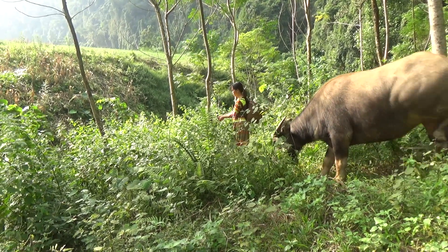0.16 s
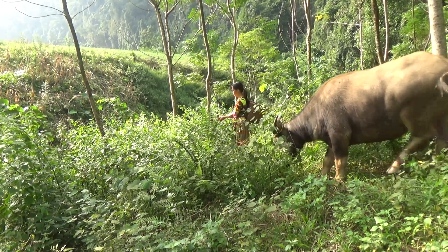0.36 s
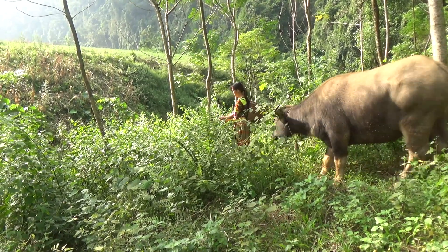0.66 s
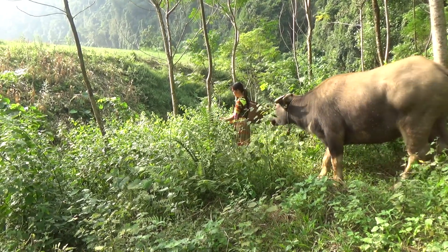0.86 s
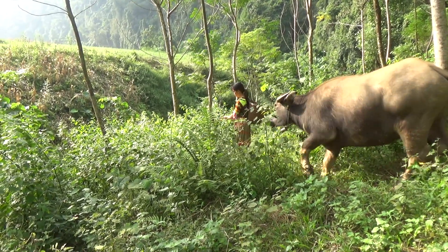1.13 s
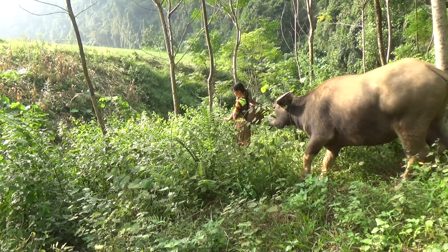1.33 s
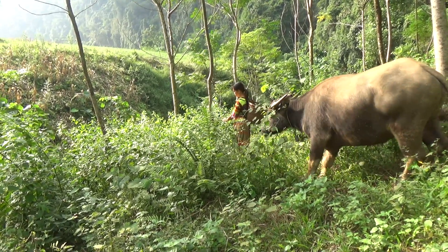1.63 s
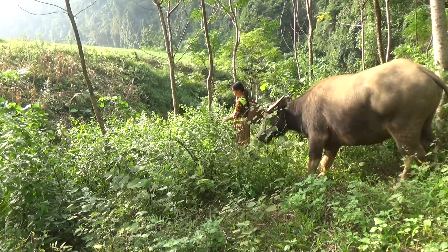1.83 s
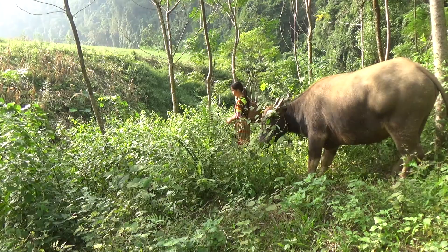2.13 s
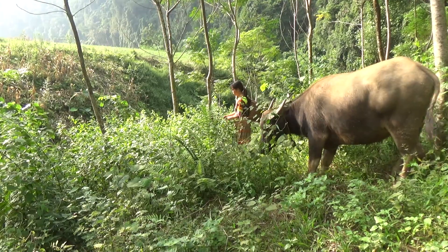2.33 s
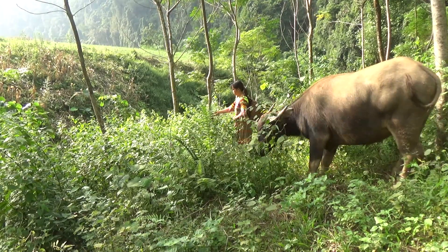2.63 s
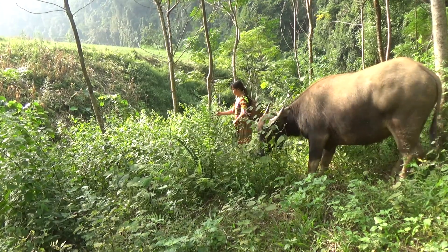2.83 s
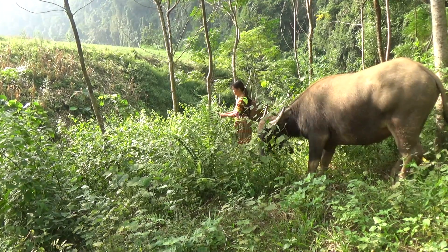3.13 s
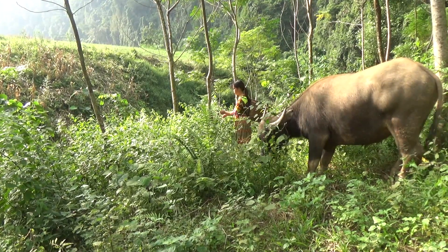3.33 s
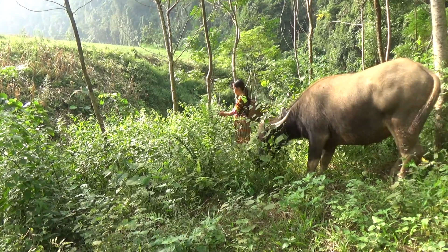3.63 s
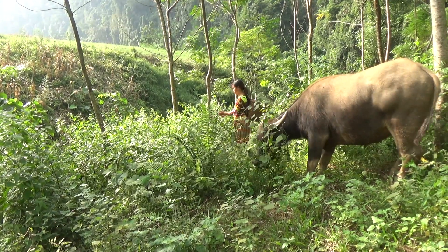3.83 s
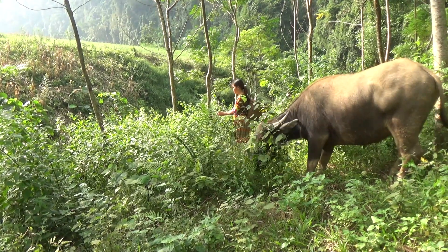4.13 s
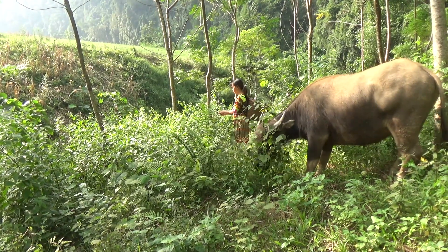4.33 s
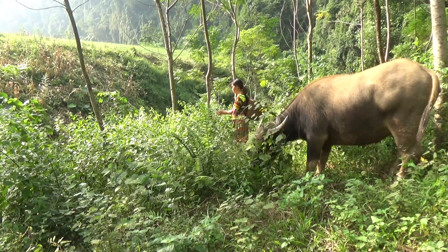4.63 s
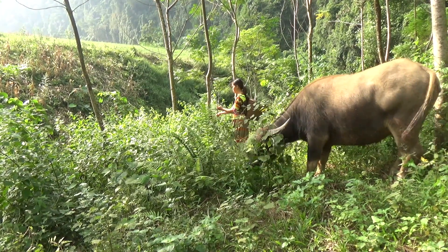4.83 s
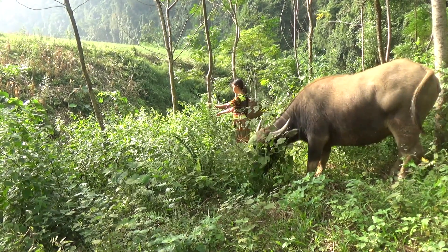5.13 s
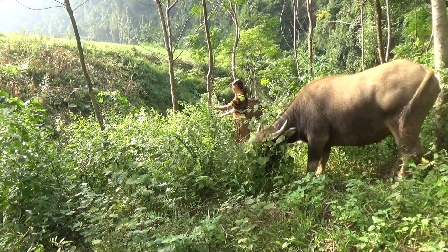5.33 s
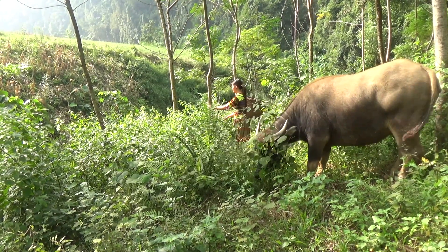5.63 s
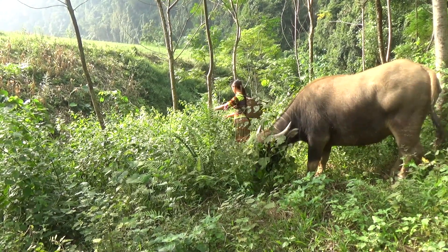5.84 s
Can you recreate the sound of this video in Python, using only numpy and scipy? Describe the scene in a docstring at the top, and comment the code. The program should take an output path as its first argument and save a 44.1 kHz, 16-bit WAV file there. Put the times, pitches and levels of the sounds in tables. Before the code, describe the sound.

A small metal bell clinks unevenly as a buffalo grazes, stems snapping and leaves swishing, over a fast cricket trill and thin insect hiss.

```python
"""A small metal bell clinks on the neck of a buffalo grazing in forest undergrowth a few metres off:
each blow sets off a set of fading sine tones. Stems snap and leaves swish (shaped noise), and hooves thud
(short low tones). A near cricket trills (a pulsed sine) until it stops at about 4 s, while a far one (throbbing
noise) swells late. Behind them lie a far insect chorus, the forest and a soft rumble, all coloured noise."""
import sys
import numpy as np
from scipy import signal
from scipy.fft import rfft, irfft, next_fast_len
from scipy.io import wavfile
from scipy.ndimage import uniform_filter1d

SR = 44100
rng = np.random.default_rng(int(sys.argv[2]) if len(sys.argv) > 2 else 0)


def waveform_to_disk(signal):
    """Save audio, clipped to [-1, 1], as 16-bit WAV at the path in sys.argv[1]."""
    frames = np.transpose(np.atleast_2d(signal))
    scaled = np.clip(frames, -1, 1) * 32767
    samples = np.round(scaled).astype(np.int16)
    wavfile.write(sys.argv[1], SR, samples)


N = 263718
T = np.arange(N) / SR  # time in s

# Colours of the noises; only the shape counts, loudness is set elsewhere: pitch_hz, relative_db
RUMBLE_COLOUR = [(20, -47), (60, -5), (128, 2), (200, 0.5), (350, -36)]
FOREST_COLOUR = [(100, -8), (240, 3), (380, 0.5), (500, -3.5), (1000, -4.5), (2000, -8), (3500, -15),
                 (8000, -18.5), (15700, -15)]
CHORUS_COLOUR = [(5400, -36), (6000, 0.5), (6500, 3.5), (7000, 8), (7500, -0.5), (8200, -21)]
FAR_CRICKET_COLOUR = [(6500, -25), (6800, -3), (7050, 1), (7350, -5)]
LARGE_LEAF_COLOUR = [(500, -40), (900, -5.5), (1200, -5.5), (2500, -3), (4000, -2.5), (5500, -1.5),
                     (8000, -31)]
FINE_LEAF_COLOUR = [(2500, -33), (4000, -15.5), (6200, -0.5), (9000, 1), (11000, -0.5), (13000, -1.5),
                    (15700, -2)]
# Left-right difference in the noises, before any extra side gain: pitch_hz, side_minus_mid_db
SIDE_COLOUR = [(60, -25), (250, -16), (700, -15), (2000, -33), (7000, -32), (14000, -22)]
# Loudness of the far rumble before its random drift: time_s, level_db
RUMBLE_LEVEL = [(0.0, -62), (0.56, -64.5), (0.8, -58), (1.13, -64.5), (2.05, -61), (2.4, -67), (2.8, -63.5),
                (3.35, -68), (3.52, -58), (3.7, -80), (4.6, -80), (5.1, -70), (5.65, -64.5), (5.98, -68)]
# Loudness of the far cricket before drift and throb: time_s, level_db
FAR_CRICKET_LEVEL = [(0, -63), (4.6, -63), (5.3, -53), (5.98, -52.5)]
# Hooves and soft knocks: middle_s, level_db, pitch_hz
THUDS = [(3.05, -45, 86), (3.401, -48, 124), (3.5, -51, 112), (3.525, -45, 91), (3.565, -46.5, 116),
         (4.234, -49, 90), (4.251, -54, 130), (4.271, -50.5, 106), (4.771, -44.5, 325)]
# Leaves brushed, before random flutter: peak_s, fine_leaves_db, large_leaves_db,
# rise_s, fall_s (the time to change by 10 dB)
SWISHES = [(0.05, -45.5, -51.5, 0.26, 0.18), (0.18, -44.5, -48.5, 0.055, 0.16),
           (0.645, -31.5, -42, 0.079, 0.081), (0.81, -45.5, -58, 0.061, 0.12),
           (1.1, -47.5, -57.5, 0.23, 0.12), (1.18, -44, -55, 0.094, 0.084),
           (1.28, -42, -55.5, 0.075, 0.033), (1.5, -41, -51.5, 0.13, 0.16), (2.04, -44.5, -50, 0.13, 0.045),
           (2.124, -39, -47.5, 0.028, 0.043), (2.36, -31.5, -47, 0.051, 0.05),
           (2.6, -51, -58.5, 0.27, 0.51), (3.28, -50, -72, 0.089, 0.043), (3.67, -42.5, -58, 0.065, 0.16),
           (4.14, -44, -57.5, 0.11, 0.15), (4.62, -41.5, -57, 0.047, 0.068),
           (4.746, -38, -49, 0.074, 0.065), (4.93, -47, -55.5, 0.13, 0.09), (5.15, -45, -58, 0.04, 0.23),
           (5.5, -51, -62, 0.11, 0.044), (5.93, -42, -55.5, 0.085, 0.15)]
# Leaves between brushes, before random flutter: fine_leaves_db, large_leaves_db
LEAVES_REST_DB = (-53.5, -63)
# Stems snapping: start_s, fibre_peak_db, fibre_pitch_hz, break_ms, woody_knock_db (against the fibres)
SNAPS = [(0.646, -20, 6190, 0.69, -12), (0.774, -24.5, 8000, 0.93, -16), (0.811, -31, 5000, 3, -10.5),
         (0.8208, -26, 8500, 1, -26), (1.0386, -32, 7200, 2, -17), (1.0965, -29, 6000, .4, -25),
         (1.102, -39, 8000, .6, -20), (1.134, -22.5, 9630, 1.5, -30), (1.1642, -26, 6400, 1, -13),
         (1.2954, -22.5, 10000, 3.4, -27), (1.4927, -27, 9400, 0.58, -12), (1.4985, -27, 8760, 0.36, -21),
         (1.562, -32, 4500, 1.3, -7), (1.627, -29, 9000, 3.2, -11), (1.8137, -30, 7110, .4, -15),
         (1.8482, -20.5, 8950, 1.5, -22), (2.308, -8, 8100, 6.4, -28), (2.5808, -22, 8250, 3.1, -13),
         (3.2423, -28.5, 8550, 3.2, -29), (3.2727, -29, 10000, 1.5, -25), (3.2847, -30.5, 7300, 2.3, -27),
         (4.069, -12, 8300, 0.85, -22.5), (4.5927, -8.5, 9100, 0.7, -21), (4.5952, -9.5, 6540, 1.67, -17.5),
         (4.9207, -28, 7640, 2.1, -6.5), (4.9333, -19.5, 9100, 1.2, -13), (4.9912, -31.5, 6730, 1.2, -19)]
# Band of the woody knock: low_hz, high_hz
SNAP_BODY_HZ = (920, 2660)
# Clapper blows: start_s, strength_db, hardness_db_per_octave, place_on_rim_deg, side_facing_listener_deg,
# mouth_knock_db, then lean_900_db, lean_2450_db, lean_6450_db: how far the upper twin near
# that pitch is raised and the lower twin cut
BLOWS = [(0.11, -48.5, -2.5, 130, 156, -64, 0, -5, 27), (1.168, -39.5, 0.5, 12, 45, -41, -6, -2, 4),
         (1.235, -34, -6.5, 19, 164, -39, -3, 12.5, 3), (1.524, -28, -1.5, 20, 43.2, -31, 1, 10, -16),
         (1.676, -26.5, -2, 48, 123.7, -28.5, -2.5, 6.5, -1),
         (1.965, -21, -1.5, 18, 68, -29.5, -6, 26, 11.5), (2.148, -27, -3, 30.7, 174, -43, 5, 5, -1.5),
         (2.678, -27.5, -5.5, 78, 130, -30.5, -1, -1, 3),
         (2.901, -33.5, -3.5, 90.4, 112.7, -35.5, -4, -8, -1),
         (3.083, -42.5, -6.5, 52, 84.2, -36.5, 6, 11.5, -16),
         (4.524, -31.5, 1, 81.6, 115, -33.5, 12.5, 7, 2), (4.682, -49, -4.5, 96, 102, -61, 5.5, 8, 26.5),
         (4.775, -41.5, 1, 16.6, 48, -41, -5, -11.5, -5), (4.87, -51.5, -1, 7.4, 17, -54, 0, 5, 20)]
# How each bell mode (one way of ringing) sounds: relative_db, t60_s (time to fade by 60 dB)
BELL_RING = [(-25, 1.1), (-16, 1.37), (-8.5, 0.32), (-20.5, 0.44), (-6, 0.29), (-8.5, 0.23), (11.5, 0.18),
             (6, 0.22), (8, 0.14), (-6.5, 0.099), (1.5, 0.076), (6.5, 0.14), (13, 0.06), (11, 0.064),
             (6.5, 0.072), (-4, 0.072)]
# Shape of the same modes, the lower ones in close twins: pitch_hz, waves_round_rim, antinode_deg
BELL_WAVES = [(903, 2, 60.0), (935, 2, 67.5), (2418, 3, 127.5), (2495, 3, 142.5), (4572, 4, 30.0),
              (4662, 4, 82.5), (6317, 6, 30.0), (6607, 6, 142.5), (6856, 2, 127.5), (7465, 1, 60.0),
              (8575, 1, 67.5), (8781, 6, 15.0), (9285, 5, 112.5), (10332, 3, 142.5), (10782, 2, 105.0),
              (12130, 1, 60.0)]
# Brief modes heard only in the blow: pitch_hz, relative_db, t60_s
CLANK = [(5880, -9, 0.047), (11810, -1, 0.038), (13800, -23, .04), (15600, -7, .05)]
# Air in the bell: pitch_hz, t60_s
MOUTH = (1125, 0.029)

FOREST_DB, CHORUS_DB = -56, -57  # levels before random drift
EXTRA_SIDE_DB = 18  # gain of the side part, in the chorus and the far cricket
FAR_CHIRPS_PER_S, FAR_CHIRP_S = 24.2, 5.655  # rate, time of one chirp
CHIRPS_PER_S, FIRST_CHIRP_S = 24.165, .45 / 24.165
CRICKET_HZ, CHIRP_S, CHIRP_SAG_HZ = 7260, .0045, 70
CRICKET_DB, CRICKET_PAN_DB = -48, 1.5
CRICKET_STOPS_S, CRICKET_FADE_S = 4.02, 0.019
SWELL_ROUNDNESS = 1.15  # 1 = pointed peak, 2 = rounded
SNAP_ATTACK_S, SNAP_TAIL_DB, SNAP_TAIL_S = 0.00035, -14.5, .006
TICK_DB, TICK_S, TICK_HZ = 4.5, 0.0019, (2900, 14700)
NEAR_PAN_DB = -.9  # left minus right, for bell and stems
TOP_HZ = 15750


def undb(db):
    """Turn dB into a gain."""
    return 10 ** (np.asarray(db, float) / 20)


def shape(x, points):
    """Colour a sound along its last axis by (pitch_hz, db) points, joined on a log pitch scale."""
    point_hz, db = np.transpose(points)
    n = next_fast_len(N)
    hz = np.arange(n // 2 + 1) * SR / n
    gain = undb(np.interp(np.log(hz + 1), np.log(point_hz), db))
    return irfft(rfft(x, n) * gain, n)[..., :N]


def unit(x):
    """Scale to an rms (average strength) of 1."""
    return x / np.sqrt(np.mean(x ** 2))


def walk(rate):
    """Wander at random: values held for 1 / rate s, then smoothed twice."""
    k = int(SR / rate)
    steps = np.repeat(rng.standard_normal(N // k + 1), k)
    return uniform_filter1d(uniform_filter1d(steps, k), k)[:N]


def left_right(mid, side, side_db):
    """Make left and right from a shared part and an unrelated side part."""
    side = undb(side_db) * shape(side, SIDE_COLOUR)
    return np.array([mid + side, mid - side])


def hiss(points, grain_db=0., rate=900., side_db=0.):
    """Coloured two-channel noise of rms 1; grain adds a crowd of uneven ticks, `rate` a second on average."""
    tick_sizes = undb(grain_db * np.minimum(rng.exponential(size=N), 5))
    ticks = tick_sizes * (rng.random(N) < rate / SR)
    body = 9.5  # the steady part
    if grain_db > 0:
        body = body + np.sqrt(np.abs(uniform_filter1d(ticks ** 2, size=24)) * SR / rate)
    mid, side = shape(body * rng.standard_normal((2, N)), points)
    return unit(left_right(mid, side, side_db))


def add(out, s, x, pan_db):
    """Mix in a short sound at time s; a positive pan leans left."""
    i = int(s * SR)
    out[:, i:i + len(x)] += x[:N - i] * undb([[pan_db / 2], [-pan_db / 2]])


def rumble():
    """A soft far rumble: low noise that rises and sinks."""
    level_db = np.interp(T, *np.transpose(RUMBLE_LEVEL)) + 1.8 * walk(13)
    return undb(level_db) * hiss(RUMBLE_COLOUR)


def forest():
    """The forest floor: a wash of noise whose level drifts slowly."""
    return undb(FOREST_DB + 1.1 * walk(2.01)) * hiss(FOREST_COLOUR)


def chorus():
    """Many far insects blend into a narrow-band hiss."""
    return undb(CHORUS_DB + 0.91 * walk(3.1)) * hiss(CHORUS_COLOUR, side_db=EXTRA_SIDE_DB)


def far_cricket():
    """A second cricket far off, blurred to a narrow-band throbbing hiss that swells late."""
    throb = np.cos(np.pi * FAR_CHIRPS_PER_S * (T - FAR_CHIRP_S)) ** 6
    level_db = np.interp(T, *np.transpose(FAR_CRICKET_LEVEL)) + 2.5 * walk(6)
    return undb(level_db) * throb * hiss(FAR_CRICKET_COLOUR, side_db=EXTRA_SIDE_DB)


def cricket():
    """One short wing stroke per chirp; the pitch peaks just before mid-stroke and then sags."""
    cycle = ((T - FIRST_CHIRP_S) * CHIRPS_PER_S + .5) % 1
    t = (cycle - .5) / CHIRPS_PER_S  # time from the middle of the nearest chirp
    hz = CRICKET_HZ - CHIRP_SAG_HZ * (t / CHIRP_S + 0.28) ** 2
    flutter = undb(1.5 * walk(30) + 2.5 * walk(400))
    stroke = np.exp(-(t / (1.6 * CHIRP_S)) ** 4) * flutter
    stop = np.clip((CRICKET_STOPS_S - T) / CRICKET_FADE_S, 0, 1)
    note = undb(CRICKET_DB) * stroke * stop * np.sin(2 * np.pi * np.cumsum(hz) / SR)
    return note * undb([[CRICKET_PAN_DB / 2], [-CRICKET_PAN_DB / 2]])


def thuds():
    """Hooves on soft ground: each gives about one cycle of a low note."""
    out, t = np.zeros((2, N)), np.arange(-900, 900) / SR
    for s, db, hz in THUDS:
        swell = np.exp(-(1.23 * hz * t) ** 2)
        add(out, s + t[0], undb(db) * np.sin(2 * np.pi * hz * t + 1.1) * swell, 0)
    return out


def leaves():
    """Brushed leaves: fine bright ticks over a duller swish of large ones; each brush swells, flutters and dies."""
    power = undb(LEAVES_REST_DB)[:, None] ** 2 * np.ones(N)
    for s, fine_db, large_db, rise, fall in SWISHES:
        away = np.maximum((s - T) / rise, (T - s) / fall)  # 1 = the point 10 dB below the peak
        swell = 10 ** -(away ** SWELL_ROUNDNESS)
        power = power + undb([[fine_db], [large_db]]) ** 2 * swell
    flutter = undb(2.06 * walk(60) + 1.54 * walk(250))
    fine, large = np.sqrt(power) * flutter
    bright = fine * hiss(FINE_LEAF_COLOUR, grain_db=2.5, rate=350.)
    dull = large * undb(2.05 * walk(150)) * hiss(LARGE_LEAF_COLOUR, grain_db=3, rate=300.)
    return bright + dull


def snaps():
    """A stem breaks in a burst of fibres over a woody knock; the leaves on it shake a moment longer."""
    out, t = np.zeros((2, N)), np.arange(2000) / SR
    wood = signal.butter(2, SNAP_BODY_HZ, "bandpass", fs=SR)
    tail = undb(SNAP_TAIL_DB) * np.exp(-t / SNAP_TAIL_S)
    noises = rng.standard_normal((len(SNAPS), 2, 2000))
    for (s, db, hz, ms, knock_db), (fibre_noise, wood_noise) in zip(SNAPS, noises):
        burst = np.exp(-(1000 * t / ms) ** 2) * np.clip(t / SNAP_ATTACK_S, 0, 1)
        band = signal.butter(2, [hz / 1.6, hz * 1.86], "bandpass", fs=SR)
        fibres = signal.lfilter(*band, fibre_noise * (burst + tail))
        knock = signal.lfilter(*wood, wood_noise * np.sqrt(burst))
        snap = fibres / np.abs(fibres).max() + undb(knock_db) * knock / np.abs(knock).max()
        add(out, s, undb(db) * snap, NEAR_PAN_DB)
    return out


def lobe(angle_deg):
    """Motion of a mode at an angle from its antinode (where it swings most); never quite still."""
    return np.sqrt(np.cos(np.radians(angle_deg)) ** 2 + 0.0041)


def fading_tone(hz, t60, t, phase=0.):
    """A sine that fades by 60 dB in t60 s."""
    return np.sin(2 * np.pi * hz * t + phase) * 1000 ** (-t / t60)


def bell():
    """Each blow wakes the modes by where it lands and which side faces us, and stills the ring before it."""
    out = np.zeros((2, N))
    hz, waves, antinode = np.transpose(BELL_WAVES)[:, :, None]
    db, t60 = np.transpose(BELL_RING)[:, :, None]
    phases = 2 * np.pi * rng.random((len(BLOWS), len(BELL_RING), 1))
    tick_band = signal.butter(2, TICK_HZ, "bandpass", fs=SR)
    ticks = signal.lfilter(*tick_band, rng.standard_normal((len(BLOWS), 512)))
    stops = [row[0] for row in BLOWS[1:]] + [N / SR]
    for blow, stop, phase, tick in zip(BLOWS, stops, phases, ticks):
        s, blow_db, hard, place, facing, knock_db, *lean_db = blow
        t = np.arange(int((stop - s + 0.0018) * SR)) / SR
        # a harder blow favours the modes above 4000 Hz
        gain = undb(blow_db + db + hard * np.log2(hz / 4000))
        gain *= lobe(waves * place - antinode) * lobe(waves * facing - antinode)
        # rows of the three twin pairs, lower then upper
        gain[[0, 1, 2, 3, 6, 7], 0] *= undb(np.outer(lean_db, [-1, 1]).ravel())
        ring = (gain * fading_tone(hz, t60, t, phase)).sum(axis=0)
        ring += undb(knock_db) * fading_tone(*MOUTH, t)
        for clank_hz, clank_db, clank_t60 in CLANK:
            ring += undb(blow_db + clank_db + 0.7 * hard) * fading_tone(clank_hz, clank_t60, t)
        # harder blows tick louder
        ring[:512] += undb(blow_db + TICK_DB + 0.55 * hard) * tick * np.exp(-t[:512] / TICK_S)
        fade_in = np.clip(t / .001, 0, 1)
        fade_out = np.clip((t[-1] - t) / .002, 0, 1)
        add(out, s, ring * fade_in * fade_out, NEAR_PAN_DB)
    return out


def scene():
    """Insects and forest as a wash, with hooves, leaves, stems and bell close by."""
    background = rumble() + forest() + chorus() + far_cricket()
    return background + cricket() + thuds() + leaves() + snaps() + bell()


def record(dry):
    """A steep low-pass filter cuts the sound above TOP_HZ."""
    return signal.sosfilt(signal.ellip(10, .2, 70, TOP_HZ, fs=SR, output="sos"), dry)


dry = scene()
out = record(dry)
waveform_to_disk(out)
```